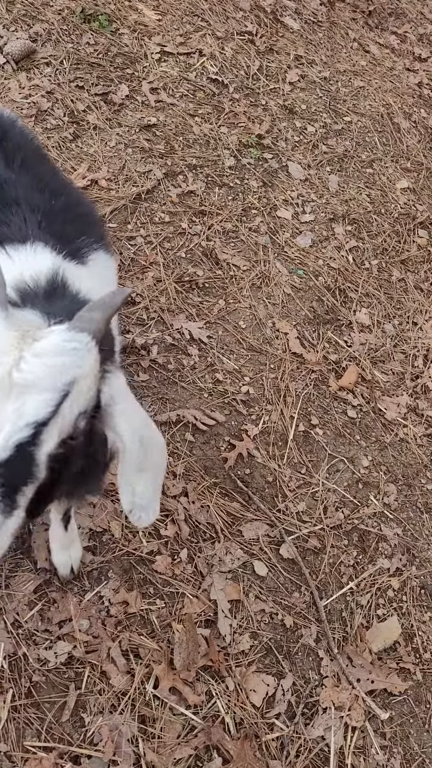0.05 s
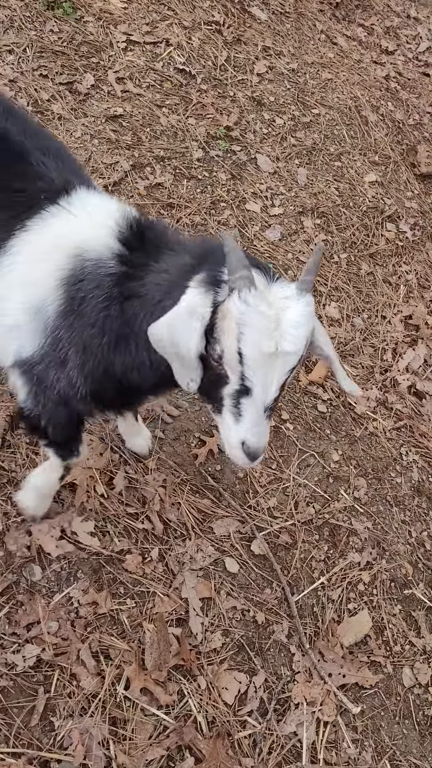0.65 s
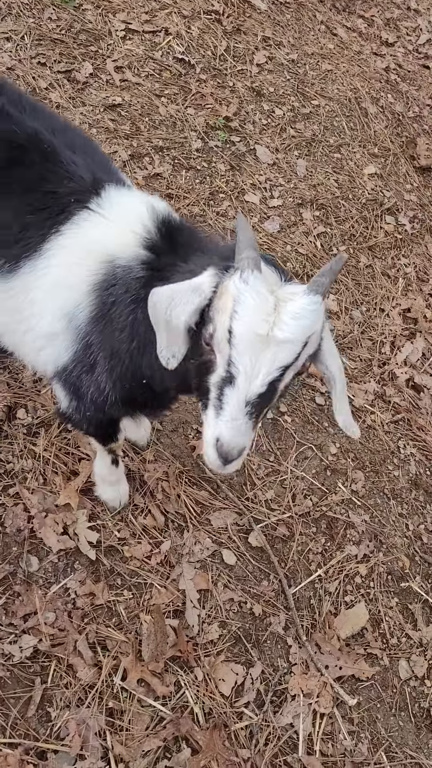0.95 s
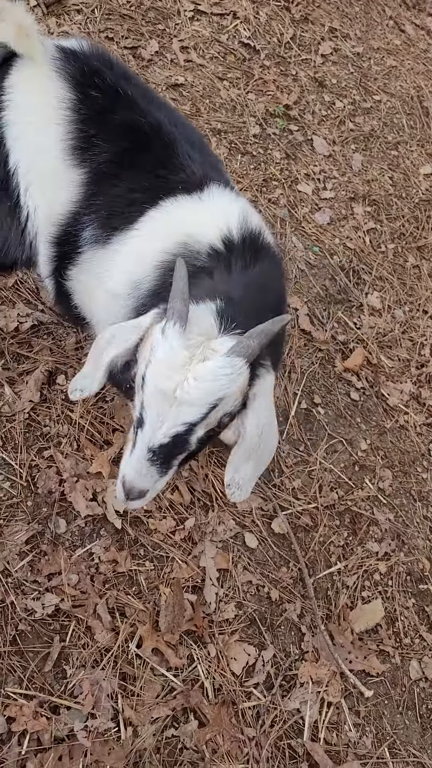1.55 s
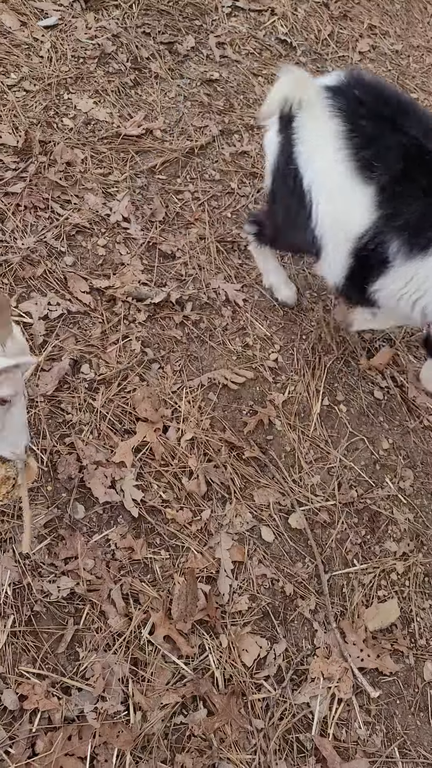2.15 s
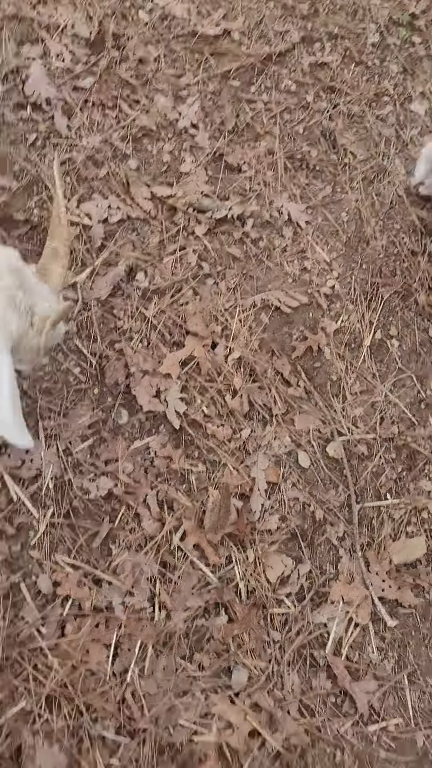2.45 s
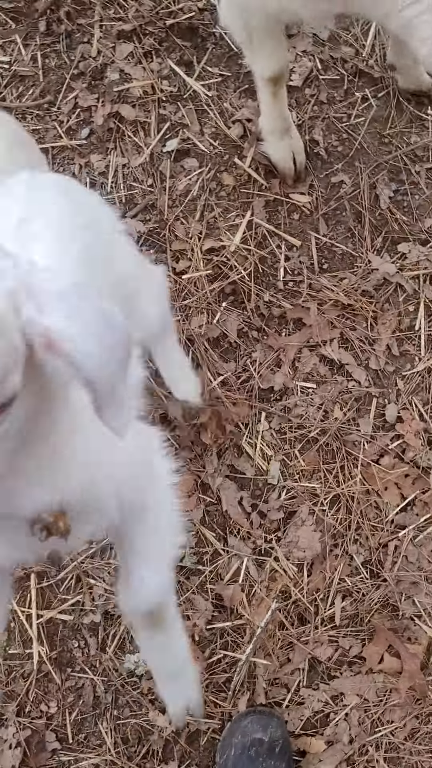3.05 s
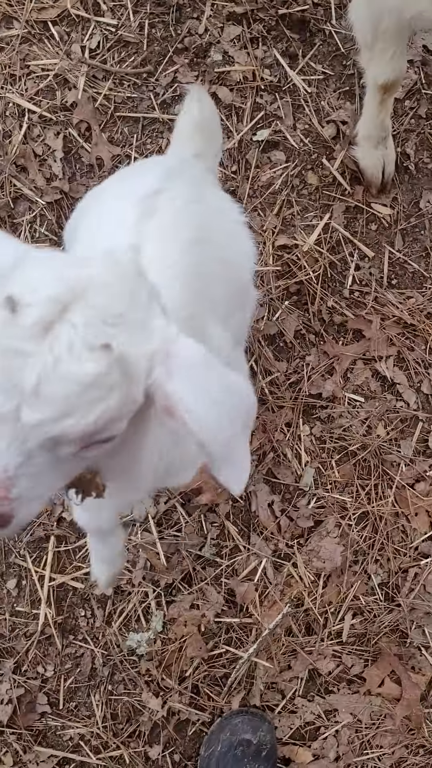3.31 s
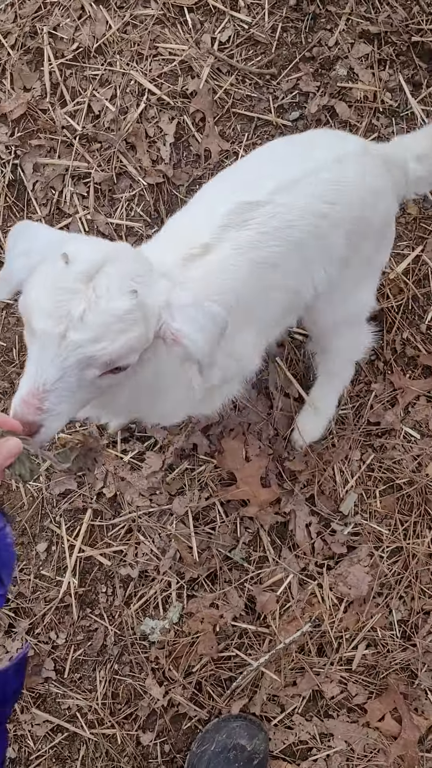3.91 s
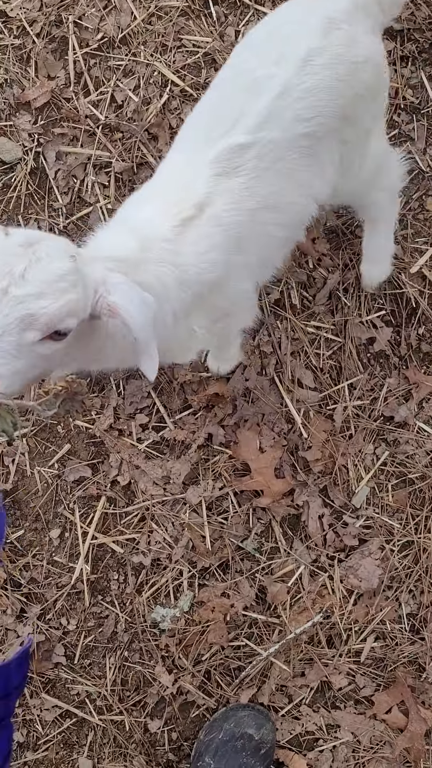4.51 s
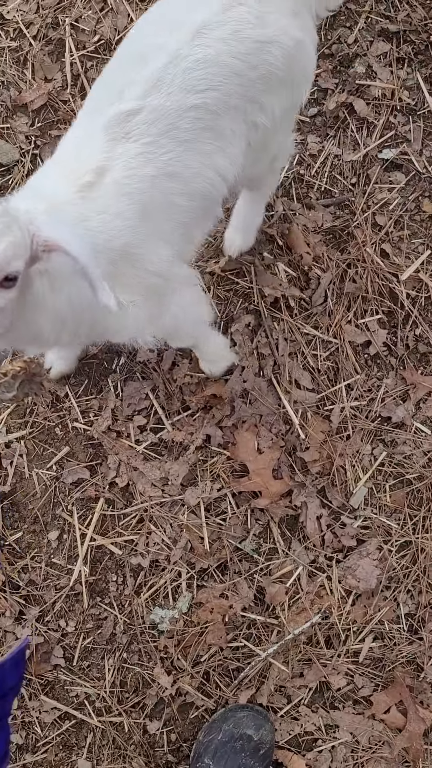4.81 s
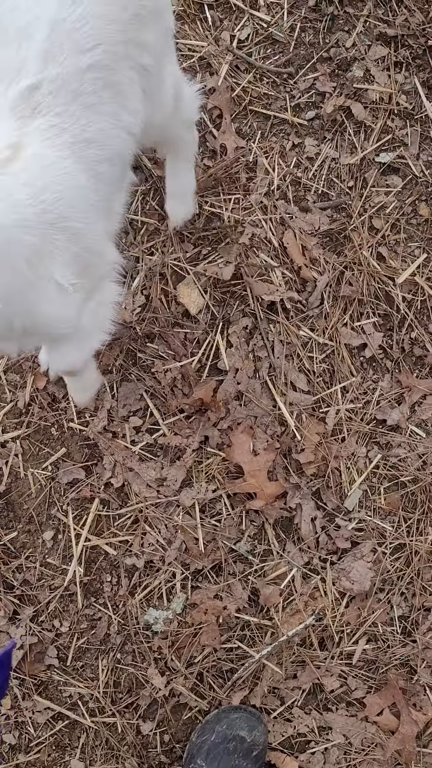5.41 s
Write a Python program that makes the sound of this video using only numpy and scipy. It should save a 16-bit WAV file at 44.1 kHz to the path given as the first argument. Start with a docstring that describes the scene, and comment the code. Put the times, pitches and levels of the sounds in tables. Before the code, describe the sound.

Irregular dry crackling and scrunching as goats step and bite at brittle plants outdoors, with slight microphone bumps and air puffs.

```python
"""Young goats step through dry leaves and straw and tear at dried flower heads, below a hand-held camera.
From the start, over a faint outdoor hush and hum, brittle fibres crackle and packed leaves scrunch.
Within a moment stalks snap, hooves pat the soil and the moving hand puffs air at the microphone.
Near 2.6 s the fingers rub the camera and knock it hard. Three softer knocks follow as the goats
crunch on, and towards the end the crackle moves to the left."""
import sys
import numpy as np
from scipy import signal
from scipy.fft import rfft, irfft, next_fast_len
from scipy.io import wavfile
from scipy.ndimage import uniform_filter1d, map_coordinates

SR = 44100
rng = np.random.default_rng(int(sys.argv[2]) if len(sys.argv) > 2 else 0)


def log_audio(samples):
    """Write samples as a 16-bit WAV file to the path given in sys.argv[1]."""
    # one column per channel
    frames = np.atleast_2d(samples).T
    # limit to full scale, then quantise
    limited = np.clip(frames, -1, 1)
    pcm = np.round(limited * 32767).astype(np.int16)
    wavfile.write(sys.argv[1], SR, pcm)


N = 249720


def amp(db):
    """Turn decibels into a number to multiply by."""
    return 10 ** (np.asarray(db) / 20)


def unit(x):
    """Scale x to an average strength (rms) of 1."""
    return x / np.sqrt(np.mean(x ** 2) + 1e-20)


def curves(rows):
    """Join the rows of a timed table with straight lines: one curve for each column after the time."""
    times, *columns = np.transpose(rows)
    return [np.interp(np.arange(N) / SR, times, column) for column in columns]


def filtered(x, response):
    """Turn each frequency f in x up or down by response(f)."""
    n = x.shape[-1]
    padded = next_fast_len(n + n // 8)
    return irfft(rfft(x, padded) * response(np.fft.rfftfreq(padded, 1 / SR)), padded)[..., :n]


def coloured(x, points):
    """Give x a tone colour, drawn as (f/Hz, level/dB) points, and a strength of 1."""
    f, db = np.transpose(points)
    return unit(filtered(x, lambda hz: amp(np.interp(np.log(hz + 1), np.log(f), db))))


def panned(side_db):
    """Gains for the two ears: a side above 0 dB is to the left, below 0 dB to the right."""
    gains = amp(np.array([side_db, -side_db]).reshape(2, -1) / 2)
    return gains / np.sqrt(np.mean(gains ** 2, axis=0))


def noise(apart):
    """Stereo hiss; the larger apart is, the less alike left and right are."""
    return unit(rng.standard_normal(N) + apart * rng.standard_normal((2, N)))


def wobble(rate):
    """A smooth random curve through rate points a second."""
    points = rng.standard_normal(int(N * rate / SR) + 4)
    return map_coordinates(points, [np.arange(N) * rate / SR])


def add(track, s, sound):
    """Mix a stereo sound in at s seconds."""
    part = track[:, max(round(s * SR), 0):][:, :sound.shape[1]]
    part += sound[:, :part.shape[1]]


def together(*levels_db):
    """Level in dB of unrelated sounds heard at once."""
    return 10 * np.log10(sum(amp(db) ** 2 for db in levels_db) + 1e-12)


def swells(rows, drop_db=9.5, roundness=1.68):
    """Level in dB of events (t/s, rise/s, fall/s, level/dB) that build up to a peak and die away."""
    power = np.zeros(N)
    for s, rise, fall, db in rows:
        at = np.arange(max(int((s - 4 * rise) * SR), 0), min(int((s + 4 * fall) * SR), N))
        t = at / SR - s
        from_peak = np.maximum(-t / rise, t / fall)
        power[at] += amp(db - drop_db * from_peak ** roundness) ** 2
    return 10 * np.log10(power + 1e-12)


# tone colour of the outdoor hush: f/Hz, level/dB
HUSH_COLOUR = [(20, -19), (60, 6), (110, 7.5), (260, 0.5), (500, -5), (1200, -24), (2500, -8.5),
               (8000, -46), (15000, -21)]
# the two notes of the hum: f/Hz, level/dB
HUM_NOTES = [(57, -68), (239, -74)]


def outdoors():
    """A steady hush with a faint, wavering, faraway hum."""
    out = amp(-64.5) * coloured(noise(apart=0.25), HUSH_COLOUR)
    for hz, db in HUM_NOTES:
        note = filtered(noise(apart=0.047), lambda f: 1 / (1 + ((f - hz) / 4) ** 2))
        out += amp(db) * unit(note)
    return out


# steps and bites, each crushing a tuft, timed at the hardest crush:
# t/s, rise/s, fall/s, crackle level/dB, splinters above crackle/dB, scrunch above crackle/dB
CRUNCHES = [(0.016, 0.0077, 0.035, -48, 7.5, -12), (0.174, 0.026, 0.015, -36, -2, -10),
            (.212, 0.011, 0.009, -47, 14, -13), (.28, .058, 0.15, -51, 2, -2.5),
            (0.384, 0.022, 0.0075, -38, 6, -9), (.421, .049, .025, -47.5, -2.5, -9),
            (.556, 0.15, 0.021, -48.5, 0.5, -10.5), (0.666, 0.0022, 0.085, -43, -1.5, -16),
            (0.736, 0.046, 0.05, -36.5, 1, -15.5), (.855, 0.032, .029, -40, -0.5, -10.5),
            (.93, 0.025, .008, -43.5, 4, -12.5), (.958, 0.013, .024, -38, 3, -14),
            (1.034, .007, 0.0055, -42.5, 6, -9), (1.105, 0.05, 0.0065, -37.5, 2, -11),
            (1.145, 0.075, 0.065, -35, -0.5, -12), (1.345, 0.075, .016, -49, -1, -13.5),
            (1.418, 0.028, 0.034, -50, 9, -25), (1.523, 0.0089, .06, -45, -11, -17),
            (1.641, 0.035, 0.047, -37.5, 1, -18), (1.83, 0.037, 0.31, -50, -8, -11),
            (1.954, 0.14, 0.016, -42.5, 6, -15.5), (2.178, 0.018, 0.04, -41.5, 2.5, -13.5),
            (2.315, 0.033, 0.023, -42.5, -0.5, -17), (2.361, 0.013, 0.044, -42, -3, -16),
            (2.509, 0.096, 0.021, -44, 1, -31), (2.574, 0.011, 0.062, -44, 4.5, -6),
            (2.668, 0.0057, 0.015, -48.5, 6, -19), (2.857, 0.087, 0.041, -41.5, 6, -8.5),
            (2.944, 0.022, .015, -42, -4.5, -2.5), (3.004, .05, 0.0099, -46, -2, 4),
            (3.114, 0.048, 0.017, -36.5, 2, -10), (3.187, 0.042, .02, -42.5, -5, 1.5),
            (3.398, 0.096, 0.048, -42, -2, -27), (3.656, 0.014, 0.023, -45, -6, 3),
            (3.683, 0.0055, 0.021, -47, -15, 4), (3.765, 0.011, .025, -69.5, 2, 15),
            (3.863, 0.051, 0.029, -34, 0.5, -26), (3.977, .016, 0.017, -39.5, -6, -7.5),
            (4.1, 0.099, 0.041, -48, 8.5, -9), (4.174, 0.02, 0.046, -45, -1.5, -5),
            (4.316, 0.014, 0.032, -56.5, -1, 1.5), (4.372, 0.025, .015, -52, 0, -1.5),
            (4.426, 0.0059, 0.023, -56, 7, 8.5), (4.489, 0.031, 0.015, -44.5, 0, -2),
            (4.566, 0.03, 0.031, -46.5, -2, -3.5), (4.629, 0.019, .025, -51, 7, -6.5),
            (4.816, 0.017, 0.0048, -35.5, 1, -17), (4.867, 0.0081, 0.0072, -43.5, -6, -13),
            (4.938, .046, 0.19, -58.5, 8.5, -12), (5.101, 0.011, 0.032, -51, 2, -8),
            (5.153, 0.0044, 0.0085, -44, 7.5, -1.5), (5.334, .015, 0.077, -52, 12, -9.5),
            (5.444, 0.079, 0.07, -45.5, 3, -3), (5.47, 0.011, 0.013, -32.5, -1, -10.5),
            (5.528, 0.049, 0.0064, -42.5, 6, -2)]
# leaves stirring in between: t/s, crackle level/dB, splinters above crackle/dB, scrunch level/dB
STIRRING = [(0.0, -46.5, 2, -62.5), (0.1, -60, -6, -59), (0.25, -53.5, 7, -70), (0.64, -51, -1, -64.5),
            (1.2, -52, 1.5, -64), (1.75, -53.5, 8.5, -60.5), (2.0, -59.5, 11, -90), (2.13, -56.5, 0, -71),
            (2.45, -52.5, 8.5, -63.5), (2.72, -57.5, -10, -56.5), (3.3, -50, -1, -50.5),
            (3.6, -58.5, 3, -54), (4.05, -49.0, -11, -57), (4.27, -61, 3.0, -68), (4.5, -57, 3, -57.5),
            (5.15, -59.5, 4, -54), (5.28, -65.5, 7, -64.0), (5.66, -62, 12, -54.0)]


def crushing():
    """Steps and bites on top of the stirring leaves: level curves for crackle, splinters and scrunch."""
    s, rise, fall, db, splinter_db, scrunch_db = np.transpose(CRUNCHES)
    stir_db, stir_splinter_db, stir_scrunch_db = curves(STIRRING)
    uneven_db = 1.6 * wobble(35)
    layers = [(db, stir_db),
              (db + splinter_db, stir_db + stir_splinter_db),
              (db + scrunch_db, stir_scrunch_db)]
    return [together(swells(zip(s, rise, fall, peaks)), floor + uneven_db) for peaks, floor in layers]


def crack(hz, side_db, swell_s, width, tail_db):
    """One fibre breaks: a tiny burst pitched near hz, then a weak echo off the leaves around it."""
    t = np.arange(SR // 40) / SR
    burst = (t / swell_s * np.exp(1 - t / swell_s)) ** 2
    echo = amp(tail_db - 60 * t / 0.024) * (1 - np.exp(-t / swell_s))
    direct = rng.standard_normal(len(t))
    lag = int(np.clip(2 * side_db, -10, 10))  # samples; the nearer side hears it first
    hiss = np.array([direct, np.roll(direct, lag)]) + rng.standard_normal((2, len(t)))
    click = filtered((burst + echo) * hiss, lambda f: 1 / (1 + 1j * (f / hz - hz / (f + 1)) / width))
    return unit(click) * panned(side_db)


def swarm(per_second, spread_db, low_hz, high_hz, swell_s, leaves=20):
    """Many leaves crack at random times and strengths, each leaf with its own pitch and side."""
    out = np.zeros((2, N))
    breaks = int(per_second * N / SR / leaves) + 1
    for hz in np.geomspace(low_hz, high_hz, leaves):
        starts = rng.integers(N, size=breaks)
        strengths = amp(spread_db * np.clip(rng.standard_normal(breaks), -2, 2))
        leaf = crack(hz, rng.normal(0, 3.5), swell_s, width=0.55, tail_db=-14)
        # lay a copy of this leaf's crack at every start
        where = (starts[:, None] + np.arange(leaf.shape[1])).ravel()
        out += [np.bincount(where, np.outer(strengths, side).ravel(), N)[:N] for side in leaf]
    return unit(out)


def patchy(x, depth_db):
    """Bending leaves change shape, so the pitches they ring at come and go."""
    spectrum = signal.stft(x, nperseg=512)[2]
    patches = rng.standard_normal(spectrum.shape)
    for axis, size in [(1, 8), (2, 14), (1, 5), (2, 7)]:  # smooth over pitch (1) and time (2)
        patches = uniform_filter1d(patches, size, axis)
    return unit(signal.istft(spectrum * amp(depth_db * unit(patches)), nperseg=512)[1][:, :N])


# tone colours of the crackle from three places around the microphone: f/Hz, level/dB
FIRST_PLACE_COLOUR = [(500, -33), (1300, -21), (2200, -6.5), (3800, -6), (5200, -4.5), (6500, -10), (7600, -3),
                      (9200, -7.5), (11500, -1), (13400, 0.5), (14000, -1), (15600, -2)]
SECOND_PLACE_COLOUR = [(500, -21.5), (1300, -7.5), (1900, -4.5), (3500, -2.5), (4600, -4), (7000, -2.5), (8000, 2),
                       (8600, -1), (10200, 0), (12000, 1.5), (13600, 0.5), (15600, 1)]
THIRD_PLACE_COLOUR = [(500, -30), (1300, -16), (2000, -2), (3200, -7.5), (4600, -5), (7000, -2.5), (9000, -5),
                      (9800, -3.5), (12000, 1), (12700, -2.5), (15600, -0.5)]
# where the goats are: t/s, place (0 first, 1 second, 2 third)
GOAT_PLACES = [(2.2, 0), (2.7, 1), (4.1, 1), (4.4, 2)]


def place_coloured(x):
    """Give x the tone colour of where the goats are, fading from one place to the next."""
    kind = curves(GOAT_PLACES)[0]
    colours = [FIRST_PLACE_COLOUR, SECOND_PLACE_COLOUR, THIRD_PLACE_COLOUR]
    return sum(np.maximum(1 - abs(kind - k), 0) * coloured(x, colour) for k, colour in enumerate(colours))


# where the crackle comes from: t/s, side/dB
CRACKLE_SIDE = [(0.0, 0), (1.0, 0), (1.7, -3), (2.35, 1.5), (2.6, -2), (2.85, 3), (3.5, 2), (4.2, 2.5),
                (4.95, 8.5), (5.3, 10), (5.43, 1), (5.6, 18)]


def crackle(level_db, splinter_db):
    """Crushed plants give tiny cracks and sharp ticks over a rustle; thin splinters add the highs."""
    cracks = swarm(per_second=900, spread_db=6, low_hz=2390, high_hz=16500, swell_s=0.00038)
    ticks = swarm(per_second=70, spread_db=2.5, low_hz=7500, high_hz=15000, swell_s=0.0004, leaves=10)
    rustle = unit(noise(apart=6.7) * amp(2.47 * wobble(300)))  # fibres give way in small clumps
    blur = amp(3.5 + 0.24 * (level_db + 62.5))  # in a hard crush the cracks blur into a rustle
    breaking = (cracks + blur * rustle) / np.hypot(1, blur) + amp(-9.5) * ticks
    plants = place_coloured(patchy(breaking, depth_db=2.5))
    lows = lambda f: 1 / (1 + (f / 7500) ** 16)
    coarse = amp(level_db - 2.2) * unit(filtered(plants, lows))
    splinters = amp(splinter_db + 0.95) * unit(filtered(plants, lambda f: 1 - lows(f)))
    return (coarse + splinters) * panned(curves(CRACKLE_SIDE)[0])


# tone colour of leaves being packed down: f/Hz, level/dB
SCRUNCH_COLOUR = [(200, -42), (500, -2), (800, 1.5), (1400, -3.5), (2000, 0), (3500, 0)]


def scrunch(level_db):
    """A goat's weight packs the lower leaves with a dull, gritty sound."""
    cracks = swarm(per_second=550, spread_db=4.5, low_hz=590, high_hz=1900, swell_s=0.00074)
    grit = patchy(cracks + noise(apart=2), depth_db=3.5)
    return amp(level_db + 2) * coloured(grit, SCRUNCH_COLOUR) * panned(-7.5)


# tone colour of the soil: f/Hz, level/dB
SOIL_COLOUR = [(50, -54), (120, 0.5), (195, -3.5), (245, 2), (420, -3), (620, -12), (1200, -42)]
# dull thudding between the steps: t/s, level/dB
THUDDING = [(0.0, -71), (1.3, -68), (1.75, -55.5), (2.1, -63.5), (2.5, -62), (3.1, -53.5), (3.55, -51.5),
            (4.05, -62), (4.25, -74), (4.55, -54.5), (5.0, -71), (5.66, -60.5)]


def soil(scrunch_db, landings, rise_s=0.004, fall_s=0.033):
    """The soil thuds softly under each scrunch, between steps, and as weight settles on a hoof."""
    settling_db = swells((s + rise_s, rise_s, fall_s, db - 14.5) for s, db, _ in landings)
    thudding_db = curves(THUDDING)[0] + 2.4 * wobble(25)
    level_db = together(scrunch_db - 8, thudding_db, settling_db)
    return amp(level_db - 1.5) * coloured(noise(apart=0.47), SOIL_COLOUR) * panned(-7.5)


# stalks and leaf ribs that snap: t/s, relative level/dB, f/Hz, side/dB
SNAPS = [(0.1666, -28.5, 11500, -2), (0.1728, -36, 6350, -6), (0.188, -29, 12800, -1.5),
         (0.2095, -32, 12000, -6.5), (0.2227, -31.5, 12200, -0.5), (0.301, -37, 13100, -1),
         (0.315, -33.5, 11400, 4), (0.3443, -19.5, 12700, 3), (0.3473, -32, 12500, 5),
         (0.3733, -23.5, 10400, -3.5), (1.0971, -29.5, 6900, -6.5), (1.1458, -28, 5100, -3),
         (1.158, -21.5, 9650, -1), (1.1723, -31, 6450, -4), (1.202, -34, 7950, -18),
         (1.255, -34, 11000, -1), (1.343, -39, 4470, 2), (1.3872, -36, 13200, -3.5),
         (1.5052, -35.5, 10400, -4.5), (1.5203, -35, 9000, -2), (1.662, -31, 11900, -8),
         (1.7297, -32.5, 12300, -23), (1.7704, -41, 13000, -19), (1.8524, -37, 12100, -17),
         (2.0576, -36, 9200, -3), (2.3148, -30.5, 9500, -4.5), (2.4672, -36, 9700, 2),
         (2.5751, -28, 10600, -3), (2.5808, -24.5, 11200, -4), (2.712, -39, 9500, -0.5),
         (2.8071, -33.5, 11100, -4.5), (2.8748, -29.5, 11900, -16), (2.8939, -30, 11800, -10),
         (2.9025, -29.5, 12000, -0.5), (3.0054, -34.5, 11200, 0), (3.3936, -30.5, 8140, 3.5),
         (3.4112, -32, 9100, 8), (3.422, -35, 9500, 1), (3.4313, -26.5, 10200, 16), (3.456, -34, 8400, 7),
         (3.5058, -37.5, 11000, 7), (3.533, -37, 8700, 3), (3.5993, -38.5, 12600, 3.5),
         (4.201, -39, 6300, 2), (4.8015, -29.5, 5400, -0.5), (4.8066, -27.5, 7400, 4),
         (4.813, -29, 4370, 9.5), (4.8184, -39, 6500, 3), (4.9533, -36, 9300, 19), (5.1503, -39, 11400, 0),
         (5.3455, -33, 11800, 18), (5.4733, -26, 8740, 3), (5.4782, -25.5, 8500, -3.5),
         (5.513, -30, 9500, -23)]


def snaps(swell_s=0.00056):
    """Thicker stalks give way one at a time, each with a single loud crack."""
    out = np.zeros((2, N))
    for s, db, hz, side_db in SNAPS:
        add(out, s - swell_s, amp(db - 8) * crack(hz, side_db, swell_s, width=1.2, tail_db=-18))
    return out.std() * place_coloured(out)


# hooves landing on soil: t/s, level/dB, f/Hz
LANDINGS = [(0.208, -37, 560), (0.285, -42, 396), (0.383, -41.5, 300), (0.561, -51, 280),
            (0.735, -35.5, 244), (0.753, -42, 208), (0.853, -48, 298), (1.127, -38, 860),
            (1.145, -37.5, 790), (1.15, -47, 303), (1.954, -40, 233), (2.31, -42.5, 250),
            (2.944, -32.5, 261), (2.972, -35, 326), (3.001, -31.5, 253), (3.106, -32.5, 540),
            (3.184, -28, 890), (3.195, -29, 460), (3.206, -35, 288), (3.395, -33.5, 246), (3.57, -41, 394),
            (3.653, -44, 705), (3.975, -41, 1120), (4.013, -37.5, 256), (4.46, -44, 810),
            (5.474, -35, 1080)]


def hooves(cushion_s=0.0019, fade_s=0.032, loss_per_bounce_db=3.5):
    """Each hoof gives a short pat, cushioned by leaves, and the soil under it bounces a few times."""
    out, t = np.zeros((2, N)), np.arange(SR // 15) / SR
    for s, db, hz in LANDINGS:
        hiss = rng.standard_normal(len(t)) + 0.69 * rng.standard_normal((2, len(t)))
        burst = hiss * amp(-60 * t / fade_s) * (1 - np.exp(-t / cushion_s))
        pat = filtered(burst, lambda f: 1 / (1 + 0.9j * (f / hz - hz / (f + 1))) ** 2)
        bounce = np.sin(2 * np.pi * hz * t) * amp(-loss_per_bounce_db * hz * t) * (1 - np.exp(-hz * t))
        add(out, s, amp(db) * (pat / np.abs(pat).max() + amp(-3) * bounce))
    return out * panned(-5.5)


# puffs of air, timed at their peaks: t/s, rise and fall/s, level/dB
PUFFS = [(.22, 0.035, -56), (.77, 0.027, -54.5), (1.59, 0.071, -67), (1.99, 0.031, -60), (2.22, 0.033, -55),
         (3.0, 0.076, -46.5), (3.27, 0.1, -46), (3.5, 0.22, -50.5), (3.895, .03, -42), (4.055, 0.034, -48),
         (4.16, 0.036, -53), (4.385, 0.029, -50), (4.47, 0.09, -50.5)]
# tone colour of their rumble: f/Hz, level/dB
RUMBLE_COLOUR = [(15, -47), (35, -16), (55, -3), (80, -11), (130, -30), (300, -43)]


def air_puffs(still_air_db=-75):
    """Air rumbles at the microphone as the hand moves it."""
    puff_db = swells((s, length, length, db) for s, length, db in PUFFS)
    level_db = together(puff_db, still_air_db)
    return amp(level_db + 1) * coloured(noise(apart=0.9), RUMBLE_COLOUR) * panned(7.5)


# a short rub around the first knock: t/s, level/dB
RUB_LEVEL = [(2.55, -100), (2.582, -43.5), (2.603, -36.5), (2.622, -40.5), (2.645, -43), (2.685, -100)]
# its hollow ring: f/Hz, width/Hz, level/dB
RUB_RING = [(445, 58, 0), (1220, 120, -11), (1380, 85, -19.5)]
# its hum, which rises and then sags: t/s, f/Hz
RUB_PITCH = [(2.575, 436), (2.598, 480), (2.609, 500), (2.618, 422), (2.636, 293)]


def finger_rub():
    """A finger slides on the camera case with a hollow scrape and a brief hum."""
    hollow = lambda f: sum(amp(db) * 1j * f * width / (hz * hz - f * f + 1j * f * width)
                           for hz, width, db in RUB_RING)
    scrape = unit(filtered(noise(apart=0.75), hollow))
    phase = 2 * np.pi * np.cumsum(curves(RUB_PITCH)[0]) / SR
    hum = np.sin(phase) * amp(0.5 + 1.5 * wobble(150))
    return amp(curves(RUB_LEVEL)[0]) * unit(scrape + hum)


# knocks on the camera: t/s, relative level/dB, side/dB
KNOCKS = [(2.6505, -8, -10), (3.7301, -28, -30), (4.3709, -32.5, -39), (5.0409, -24.5, -47)]
# notes the case rings at: f/Hz, level/dB, time to fade by 60 dB/s
CASE_NOTES = [(346, 4, 0.023), (463, 0.5, 0.032), (890, 15, 0.0057), (1380, 16.5, 0.0023),
              (2130, -30, 0.001)]


def knocks():
    """Fingers knock on the camera, and its case rings for an instant."""
    out, t = np.zeros((2, N)), np.arange(SR // 20) / SR
    for s, db, side_db in KNOCKS:
        ring = np.zeros((2, len(t)))
        for hz, note_db, fade_s in CASE_NOTES:
            # low notes move both sides together; higher ones bend the case and push them opposite ways
            sides = panned(side_db / 2) if hz < 600 else panned(side_db) * [[-1], [1]]
            fade = amp(note_db + rng.normal(0, 1) - 60 * t / fade_s)
            ring += sides * fade * np.sin(2 * np.pi * hz * t)
        ring = filtered(ring, lambda f: (1j * f / (110 + 1j * f)) ** 2)  # a small case gives little bass
        add(out, s, amp(db + 3) * ring / np.abs(ring).max())
    return out


def scene():
    """The open air, the goats and the hand on the camera, all added up."""
    background = outdoors()
    crackle_db, splinter_db, scrunch_db = crushing()
    goats = crackle(crackle_db, splinter_db) + scrunch(scrunch_db) + soil(scrunch_db, LANDINGS)
    goats += snaps() + hooves()
    hand = air_puffs() + finger_rub() + knocks()
    return background + goats + hand


def record(dry):
    """The camera keeps nothing above 15900 Hz."""
    return filtered(dry, lambda hz: hz < 15900)


dry = scene()
out = record(dry)
log_audio(out)
```